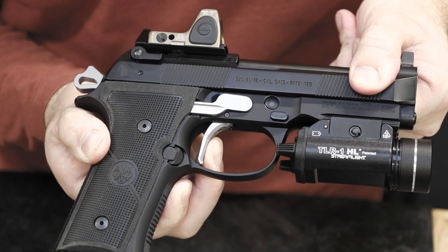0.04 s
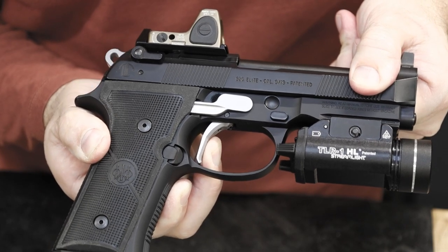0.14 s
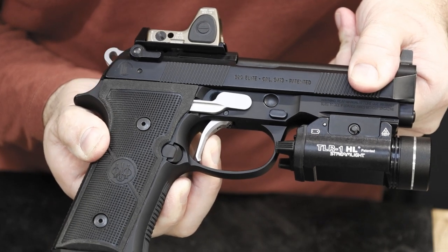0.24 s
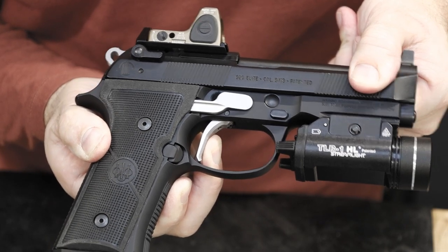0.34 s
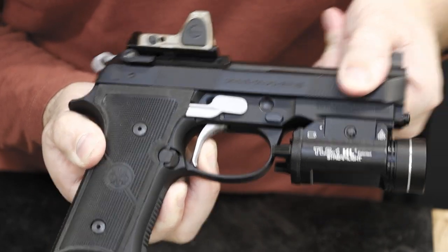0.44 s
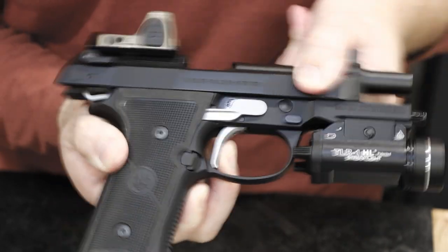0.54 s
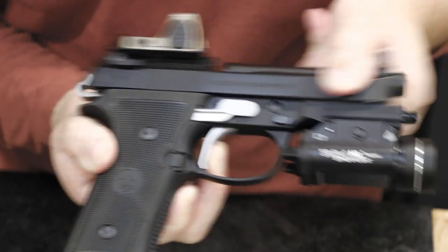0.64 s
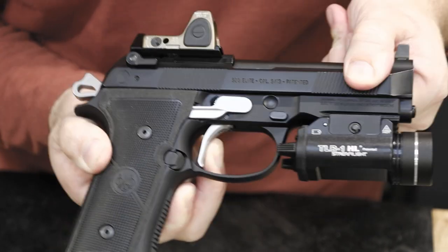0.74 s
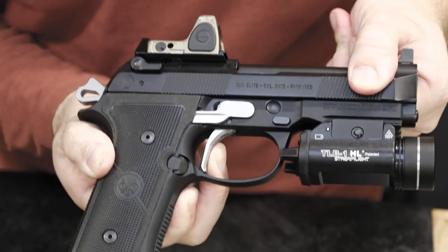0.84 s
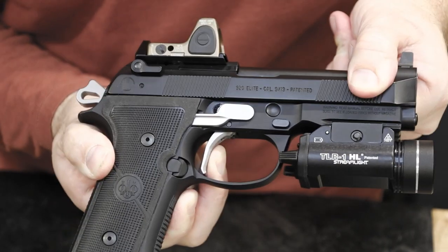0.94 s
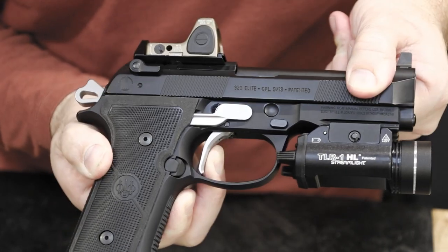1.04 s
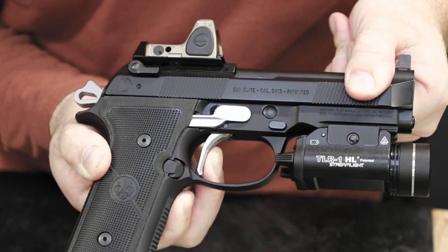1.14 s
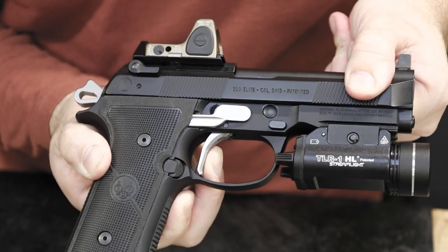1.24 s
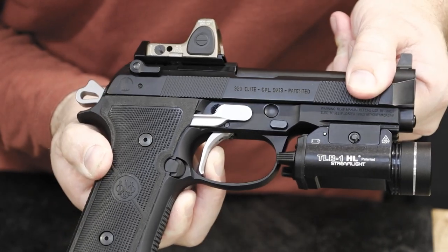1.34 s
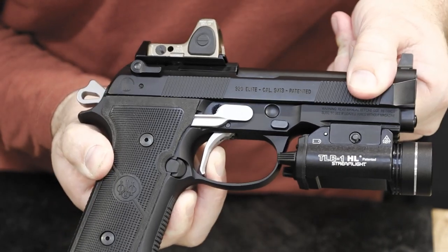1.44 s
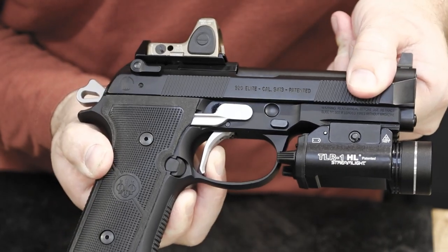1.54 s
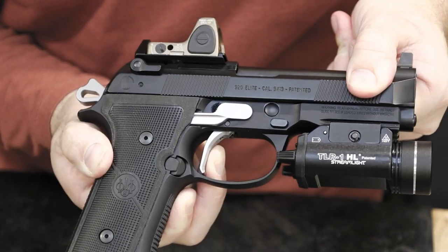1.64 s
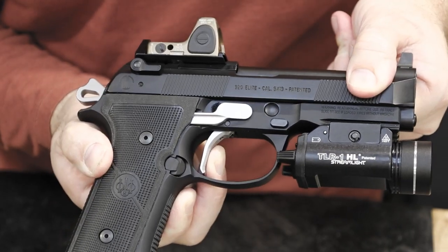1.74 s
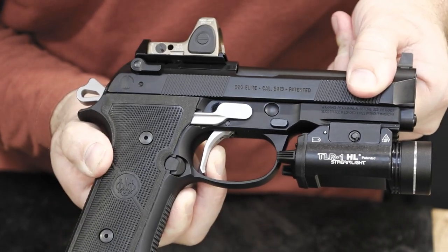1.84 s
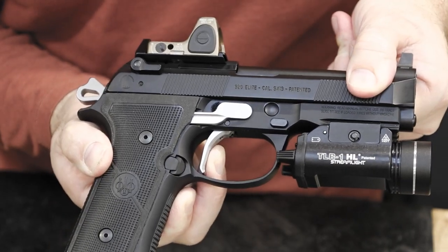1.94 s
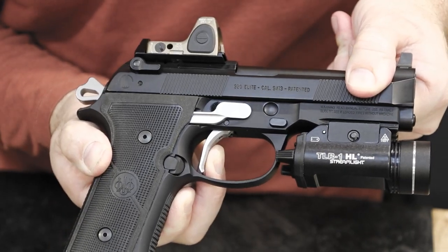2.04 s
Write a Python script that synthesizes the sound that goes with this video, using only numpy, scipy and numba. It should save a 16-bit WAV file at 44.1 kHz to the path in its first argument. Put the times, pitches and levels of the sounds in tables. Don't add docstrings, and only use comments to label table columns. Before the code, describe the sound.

An unloaded pistol is worked by hand, close to the microphone. At about 0.2 s the hammer drops with a sharp, bright click and faint steel ringing. From 0.54 to 0.62 s the slide is drawn back in a quick clatter; at 0.72-0.78 s it rattles and slams home, loudest and clipped. Hard-room echoes fade into low, steady ventilation hum until the end.

```python
import sys
import numpy as np
from scipy import signal
from scipy.fft import rfft, irfft, next_fast_len
from scipy.io import wavfile
from scipy.ndimage import uniform_filter1d
from numba import njit

SR = 44100
rng = np.random.default_rng(int(sys.argv[2]) if len(sys.argv) > 2 else 0)


def amplitude_ratio(level_db):
    exponent = np.asarray(level_db, float) / 20
    return 10 ** exponent


def file_out(sig):
    cols = np.atleast_2d(sig).T
    lim = np.clip(cols, -1, 1)
    pcm = np.round(lim * 32767).astype(np.int16)
    wavfile.write(sys.argv[1], SR, pcm)


N = 92610

# t/s, level/dB, main resonance f/Hz, its share over the frame/dB, rattle t60/s
HAMMER_HITS = [
    (.1984, -9, 1850, 6, .02),
    (.2008, -6, 9200, 8, .01),
    (.203, -6, 1850, 16, .02),
    (.2043, -1, 7200, 6, .009),
    (.2069, 10, 8500, -1, .014),
    (.2105, -5, 3600, 8, .02),
]
DRAW_HITS = [
    (.5415, -30, 2000, 14, .02),
    (.5432, -21, 5800, 10, .014),
    (.5535, -24, 2200, 22, .08),
    (.5612, -18, 3000, 3, .014),
    (.5644, -6, 2800, 7, .011),
    (.568, -18, 1500, 16, .04),
]
CATCH_HITS = [
    (.5722, -15, 2000, 20, .012),
    (.5743, 6.5, 4000, -1, .009),
    (.578, -8, 2300, 5, .025),
    (.5866, 3, 1900, 3, .016),
    (.5975, -9, 2500, 2, .018),
    (.6095, -14, 3500, 0, .018),
]
STOP_HITS = [
    (.6166, 4, 4300, -3, .011),
    (.6169, 0, 1340, 26, .014),
]
RETURN_HITS = [
    (.722, -24, 3500, 14, .05),
    (.7278, -17, 5500, 12, .016),
    (.732, -13, 2000, 10, .04),
    (.738, -13, 3500, 20, .016),
    (.7438, -11, 3000, 8, .014),
    (.7456, -2, 3200, 14, .022),
    (.7482, -7, 2200, 10, .016),
    (.753, -14, 2000, 16, .03),
]
SLAM_HITS = [
    (.7569, 11.5, 4600, 0, .01),
    (.7606, 5, 8200, 6, .008),
    (.7625, -3, 2200, 4, .02),
    (.765, 0, 7000, 3, .02),
    (.775, -8, 6000, 10, .018),
]

# f/Hz, width/Hz, level/dB
HAMMER_BODY = [(1980, 410, -2), (3570, 350, -2), (4670, 400, -5), (7470, 340, 0), (8840, 270, -2),
               (11700, 240, -9), (12700, 220, -7), (14100, 560, -8), (15400, 380, -9)]
DRAW_BODY = [(3150, 440, 0), (3930, 610, -1), (7120, 420, 0), (9110, 400, -5), (11100, 350, -7),
             (12800, 420, -10), (14400, 350, -9), (15300, 360, -4)]
STOP_BODY = [(3740, 270, 0), (5020, 230, -5), (6020, 510, -7), (8310, 290, -4), (11400, 580, -6),
             (12400, 250, -9), (14200, 220, -10), (14900, 540, -11)]
RETURN_BODY = [(1460, 480, -2), (3270, 350, 0), (7220, 280, -14), (8690, 310, -15), (10400, 430, -16),
               (11400, 470, -19), (14100, 350, -19)]
SLAM_BODY = [(3810, 310, 0), (4820, 200, -7), (5420, 440, -2), (7010, 230, 0), (8140, 230, -1),
             (10000, 200, -5), (11900, 270, -9), (13200, 250, -10), (14300, 210, -12)]

# f/Hz, level/dB, t60/s
HAMMER_RING = [(1460, -44, .4), (1890, -46, .4), (3500, -36, .65), (5930, -38, .6), (9400, -46, .45)]
SLAM_RING = [(2250, -44, .5), (4300, -46, .5), (5986, -42, .5), (9771, -47, .4), (13190, -43, .36)]

# f/Hz, level per Hz/dB
HAMMER_FIELD = [(530, -49), (900, -22.5), (1440, -6.5), (1580, -12), (1840, -4), (2520, -11.5), (3240, -2),
                (6030, -5), (15700, -15.5)]
DRAW_FIELD = [(530, -71.5), (900, -44.5), (979, -17), (1370, -3.5), (1940, -11.5), (2100, -10),
              (3780, -5.5), (15700, -20.5)]
SLAM_FIELD = [(530, -54), (900, -24.5), (2180, -3), (2770, -11), (3600, -1.5), (5890, -6), (11200, -13.5),
              (13600, -22.5), (15700, -34.5)]

# f/Hz, t60/s
ROOM_T60 = [(500, .6), (2000, .7), (5000, .68), (10000, .48), (13000, .4), (16000, .34)]

# f/Hz, level per Hz/dB
AIR = [(25, -19), (50, -6.5), (120, -5.5), (300, 2.5), (1000, -5), (3200, -18), (6300, -29.5),
       (16000, -34.5)]

# f/Hz, width/Hz, rms level/dB
DUCTS = [(195.6, 20, -58.5), (231, 15, -57), (287.1, 32, -49), (458, 50, -56), (745, 40, -63)]

CRACK_DB, CRACK_HZ = -4, 7000
SCATTER_DB = 2
LOW_HZ, SHARPNESS = 750, 3.5
EVEN_BINS, RING_ROUGH = 90, .085
WALL_S, RISE_S = .003, .0018
AIR_DB, MAINS_HZ, MAINS_DB = -42.5, 123, -57.5
THRESHOLD_DB, SLOPE = -20.5, .85
SENSE_S, ATTACK_S, RELEASE_S = .008, .018, .05
HISS_DB, TOP_HZ, EDGE_HZ = -87.5, 16000, 400


def unit(x):
    return x / np.sqrt(np.mean(x ** 2) + 1e-20)


def along(points, hz):
    f, value = np.transpose(points)
    return np.interp(np.log(hz + 1), np.log(f + 1), value)


def filtered(x, response):
    size = next_fast_len(len(x) + 8192)
    spectrum = rfft(x, size) * response(np.fft.rfftfreq(size, 1 / SR))
    return irfft(spectrum, size)[:len(x)]


def peak(f, hz, width):
    return 1j * f * width / (hz * hz - f * f + 1j * f * width)


def rattle(t60):
    t = np.arange(SR // 10) / SR
    spectrum = rfft(rng.standard_normal(len(t)) * amplitude_ratio(-60 * t / t60))
    local_power = uniform_filter1d(np.abs(spectrum) ** 2, size=EVEN_BINS)
    fade = np.clip(1 - 2 * t / t[-1], 0, 1)
    return irfft(spectrum / np.sqrt(local_power), len(t)) * fade


def click(body, hz, share_db, t60):
    gains = amplitude_ratio(SCATTER_DB * rng.standard_normal(len(body)))

    def response(f):
        total = amplitude_ratio(CRACK_DB) / (1 + 1j * f / CRACK_HZ)
        for k, (gain, (center, width, db)) in enumerate(zip(gains, body)):
            total = total + (-1) ** k * gain * amplitude_ratio(db) * peak(f, center, width)
        main = amplitude_ratio(share_db) * peak(f, hz, 1.6 * hz / SHARPNESS) ** 2
        low_cut = (1j * f / (LOW_HZ + 1j * f)) ** 3
        return (total + main) * low_cut

    x = filtered(rattle(t60), response)
    return x / np.abs(x).max()


def ringing(hz, t60):
    t = np.arange(SR // 2) / SR
    drift = np.cumsum(rng.standard_normal(len(t))) * RING_ROUGH
    return amplitude_ratio(-60 * t / t60) * np.sin(2 * np.pi * hz * t + drift)


def contacts(hits, body, ring=()):
    out = np.zeros(N + SR)
    for s, db, hz, share_db, t60 in hits:
        hit = amplitude_ratio(db) * click(body, hz, share_db, t60)
        out[round(s * SR):][:len(hit)] += hit
    hardest_s, hardest_db = max(hits, key=lambda hit: hit[1])[:2]
    for hz, level_db, t60 in ring:
        tone = amplitude_ratio(hardest_db + level_db) * ringing(hz, t60)
        out[round(hardest_s * SR):][:len(tone)] += tone
    return out[:N]


def room(hits, field, wet_db):
    hz, t, z = signal.stft(rng.standard_normal(SR), SR, nperseg=256)
    decay_db = along(field, hz)[:, None] - 60 * t / along(ROOM_T60, hz)[:, None]
    tail = signal.istft(z * amplitude_ratio(decay_db), SR, nperseg=256)[1]
    tail = tail * (1 - np.exp(-np.arange(len(tail)) / SR / RISE_S))
    blows = np.zeros(N)
    for s, db, *_ in hits:
        blows[round((s + WALL_S) * SR)] = amplitude_ratio(db)
    return amplitude_ratio(wet_db + 18.5) * signal.fftconvolve(blows, tail / np.linalg.norm(tail))[:N]


def ventilation():
    rush = filtered(rng.standard_normal(N), lambda f: amplitude_ratio(along(AIR, f)))
    out = amplitude_ratio(AIR_DB - 6) * unit(rush)
    for hz, width, db in DUCTS:
        duct = filtered(rng.standard_normal(N), lambda f: peak(f, hz, width) ** 2)
        out = out + amplitude_ratio(db) * unit(duct)
    drift = np.cumsum(rng.standard_normal(N)) * .012
    return out + amplitude_ratio(MAINS_DB) * np.sin(2 * np.pi * MAINS_HZ * np.arange(N) / SR + drift)


def scene():
    near = contacts(HAMMER_HITS, HAMMER_BODY, HAMMER_RING)
    near = near + contacts(DRAW_HITS + CATCH_HITS, DRAW_BODY)
    near = near + contacts(STOP_HITS, STOP_BODY)
    near = near + contacts(RETURN_HITS, RETURN_BODY)
    near = near + contacts(SLAM_HITS, SLAM_BODY, SLAM_RING)
    far = room(HAMMER_HITS, HAMMER_FIELD, wet_db=-12)
    far = far + room(DRAW_HITS + CATCH_HITS + STOP_HITS, DRAW_FIELD, wet_db=-17.5)
    far = far + room(RETURN_HITS + SLAM_HITS, SLAM_FIELD, wet_db=-18.5)
    return (near + far + ventilation())[None]


@njit
def follow(want, down, up):
    out, gain = np.zeros(len(want)), 0.0
    for i in range(len(want)):
        gain += (want[i] - gain) * (down if want[i] < gain else up)
        out[i] = gain
    return out


def top_cut(x):
    return signal.sosfilt(signal.butter(12, 16230, fs=SR, output="sos"), x)


def record(dry):
    k = 1 / (SENSE_S * SR)
    power = signal.lfilter([k], [1, k - 1], dry[0] ** 2)
    over_db = np.maximum(10 * np.log10(power + 1e-12) - THRESHOLD_DB, 0)
    gain_db = follow(-SLOPE * over_db, 1 / (ATTACK_S * SR), 1 / (RELEASE_S * SR))
    hissy = dry[0] + amplitude_ratio(HISS_DB) * rng.standard_normal(N)
    limited = filtered(hissy, lambda f: np.clip((TOP_HZ - f) / EDGE_HZ, 0, 1))
    mix = np.clip(limited * amplitude_ratio(gain_db), -1, 1)
    return top_cut(mix[None])


dry = scene()
out = record(dry)
file_out(out)
```